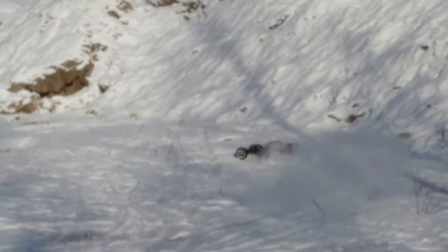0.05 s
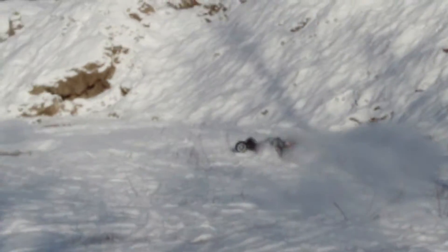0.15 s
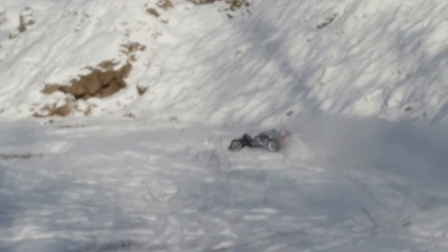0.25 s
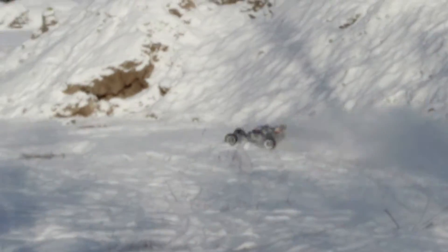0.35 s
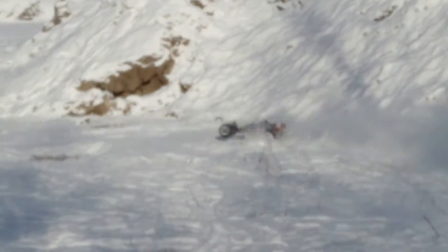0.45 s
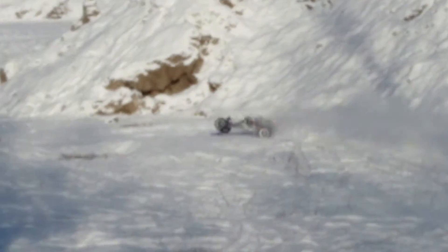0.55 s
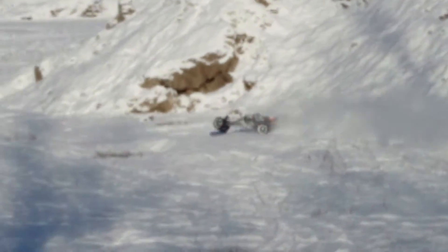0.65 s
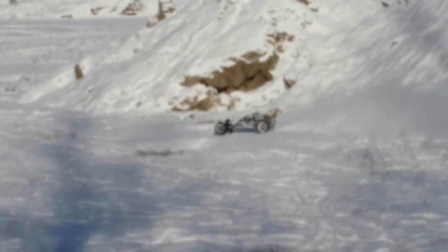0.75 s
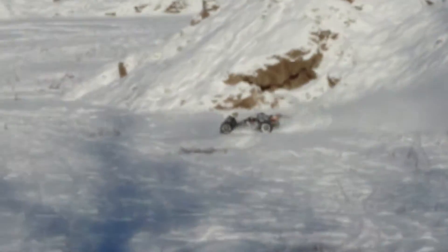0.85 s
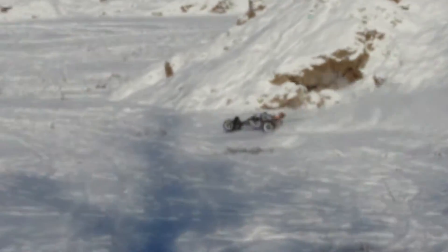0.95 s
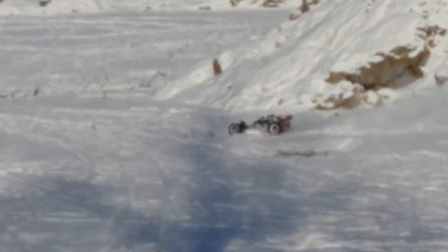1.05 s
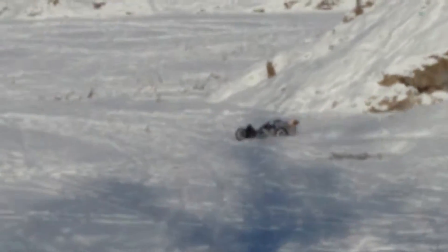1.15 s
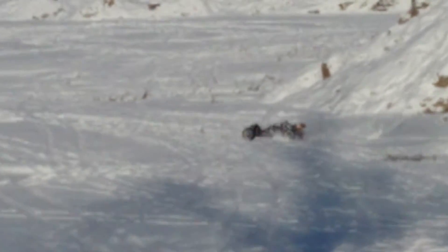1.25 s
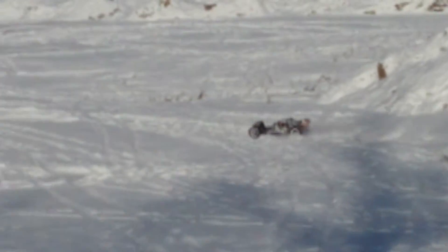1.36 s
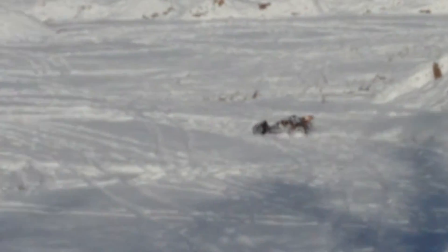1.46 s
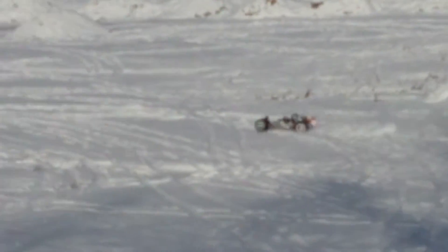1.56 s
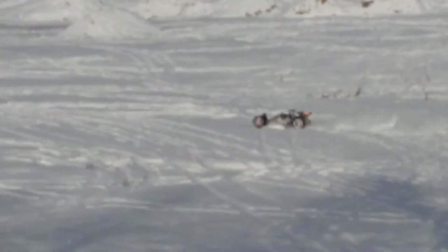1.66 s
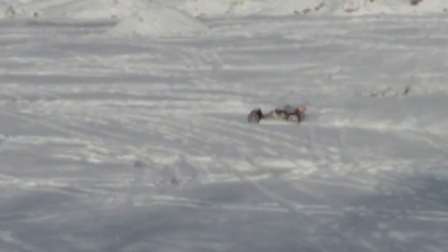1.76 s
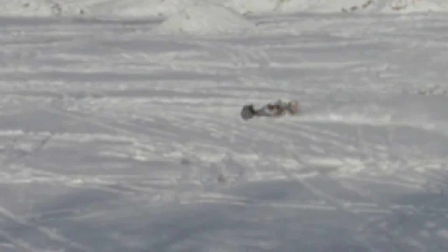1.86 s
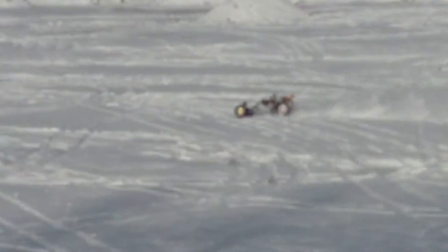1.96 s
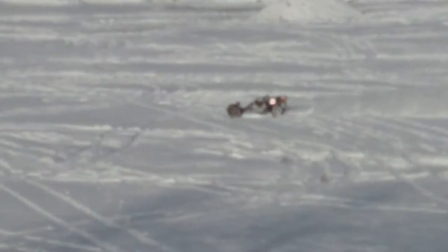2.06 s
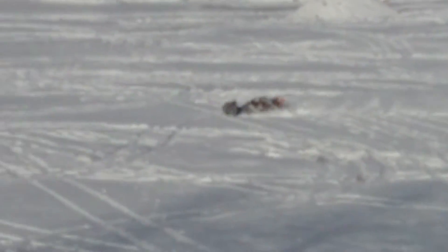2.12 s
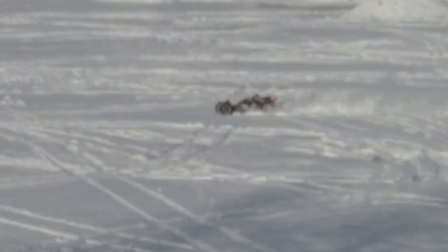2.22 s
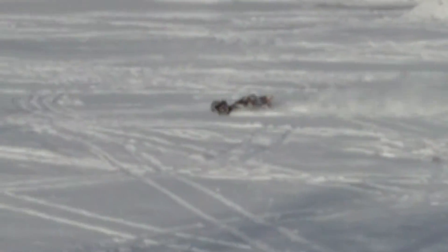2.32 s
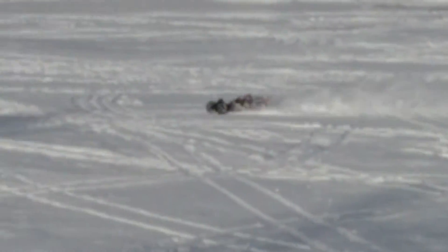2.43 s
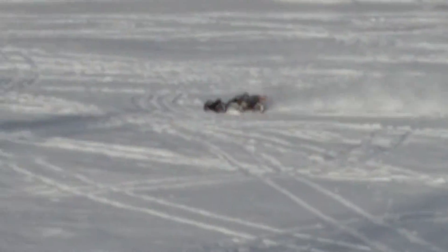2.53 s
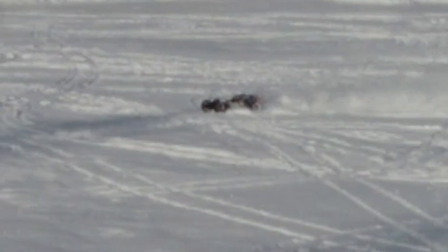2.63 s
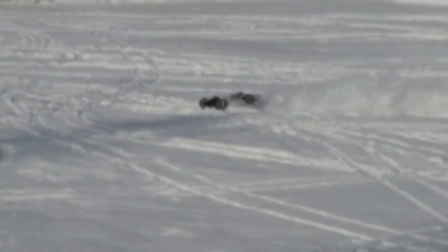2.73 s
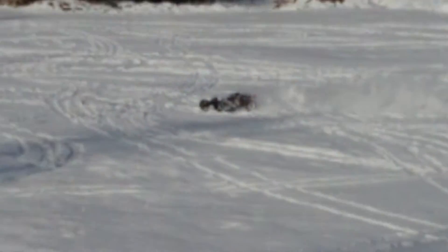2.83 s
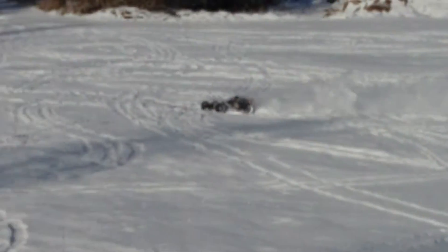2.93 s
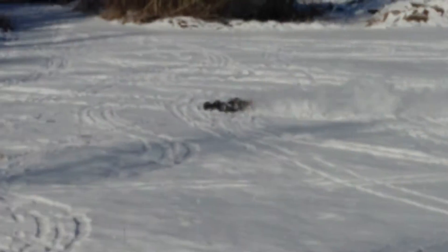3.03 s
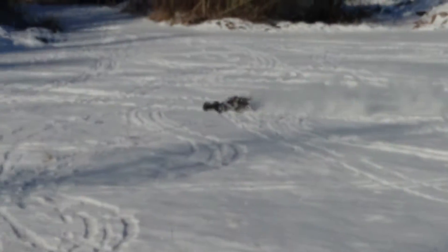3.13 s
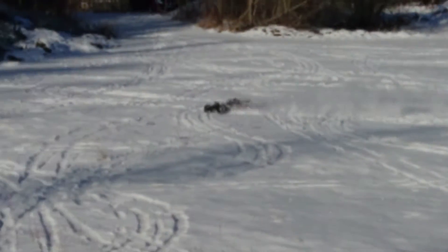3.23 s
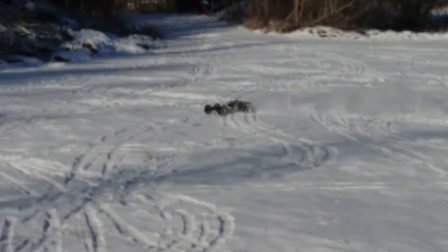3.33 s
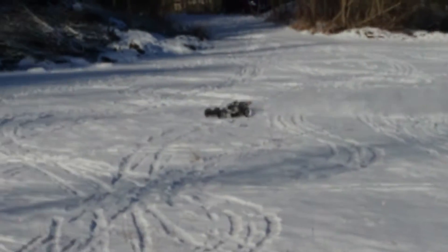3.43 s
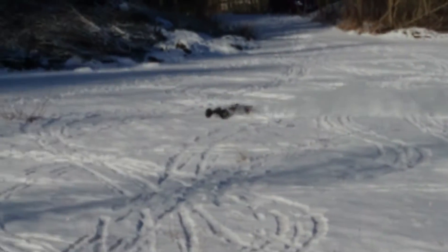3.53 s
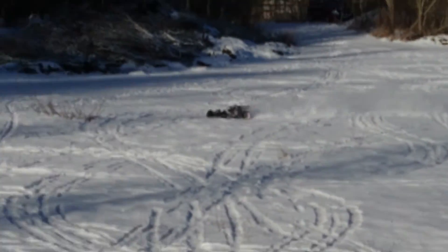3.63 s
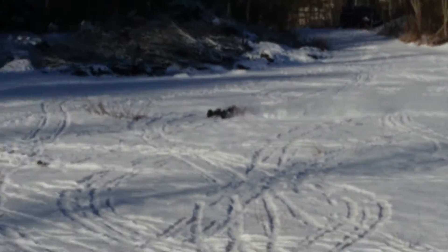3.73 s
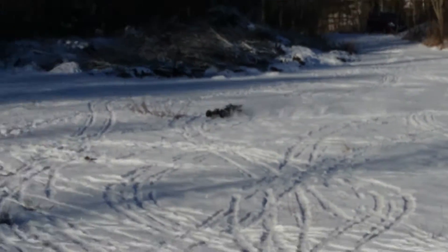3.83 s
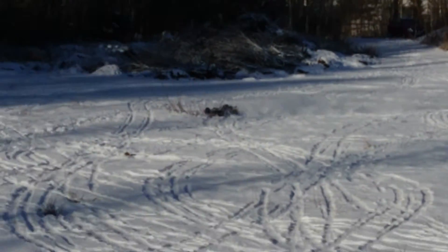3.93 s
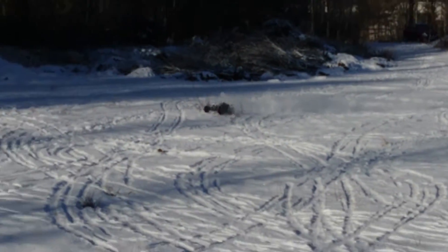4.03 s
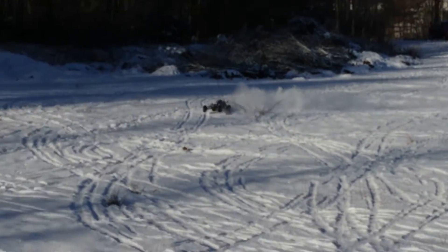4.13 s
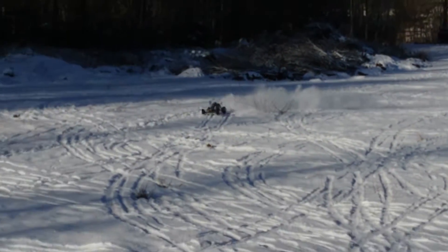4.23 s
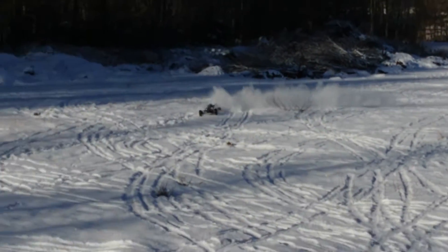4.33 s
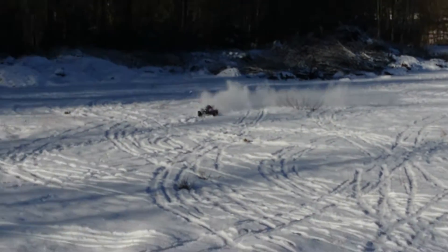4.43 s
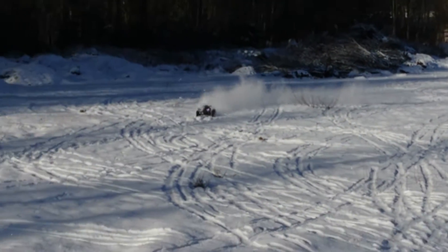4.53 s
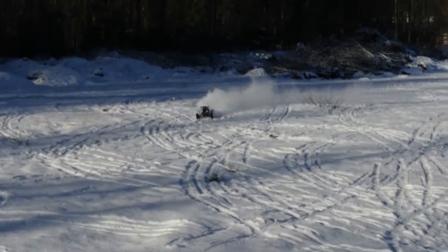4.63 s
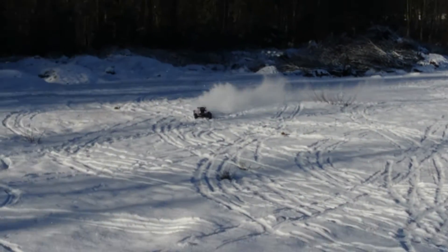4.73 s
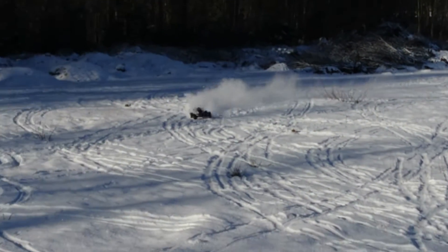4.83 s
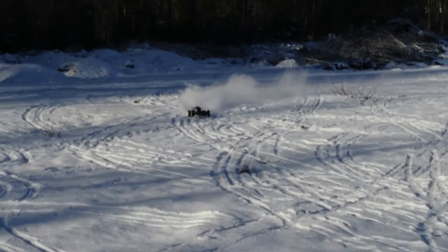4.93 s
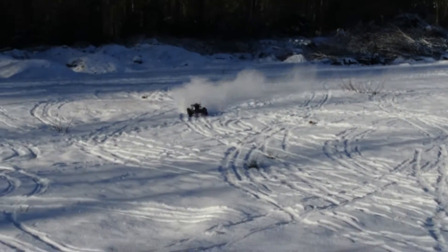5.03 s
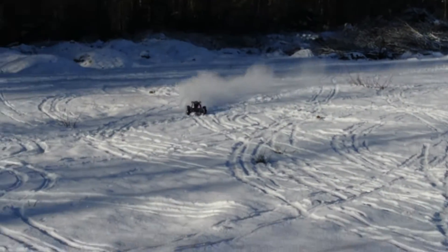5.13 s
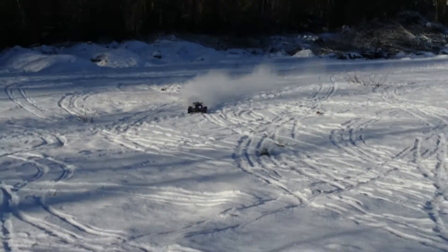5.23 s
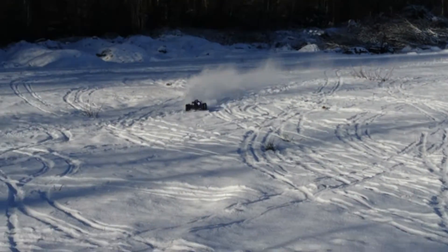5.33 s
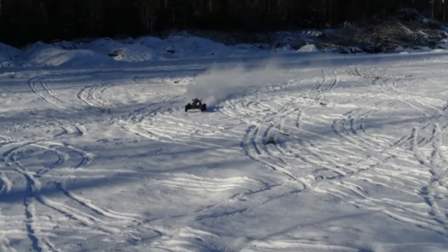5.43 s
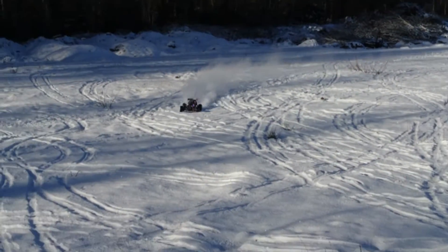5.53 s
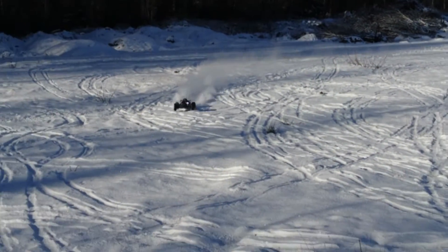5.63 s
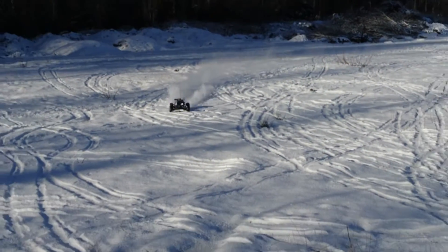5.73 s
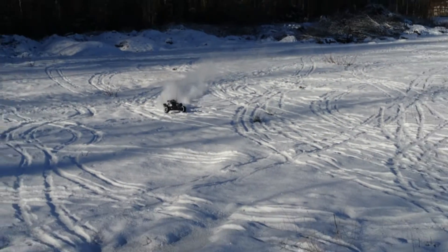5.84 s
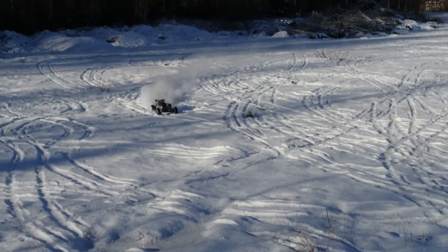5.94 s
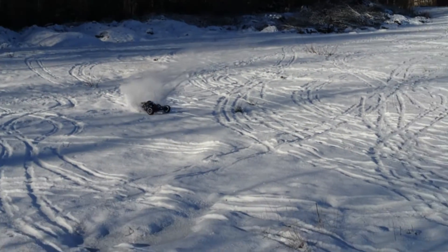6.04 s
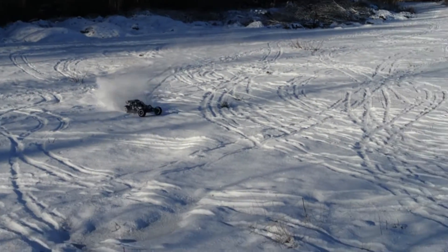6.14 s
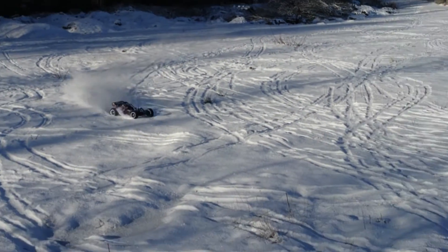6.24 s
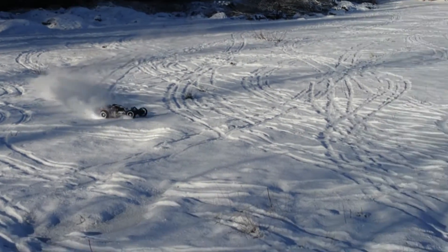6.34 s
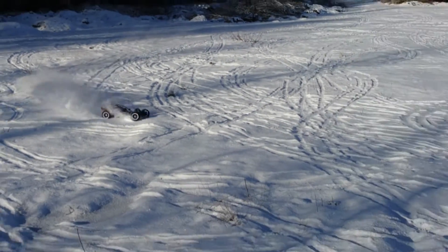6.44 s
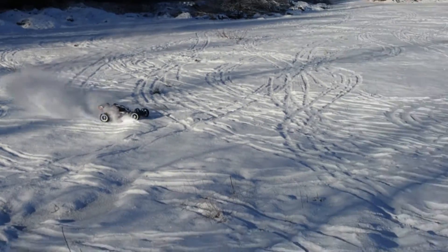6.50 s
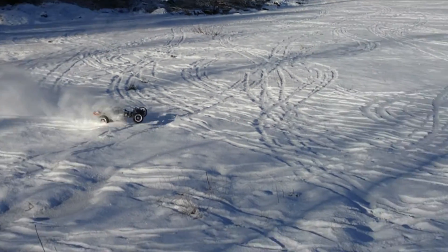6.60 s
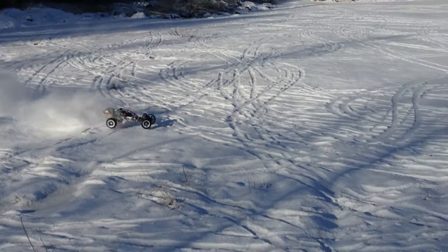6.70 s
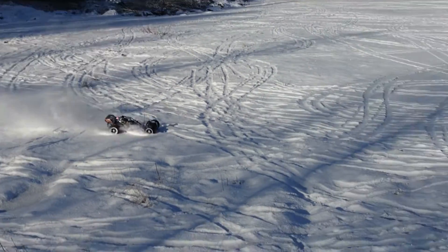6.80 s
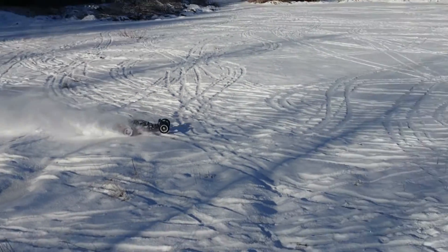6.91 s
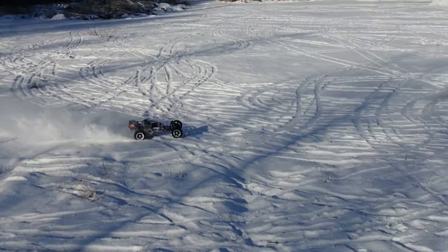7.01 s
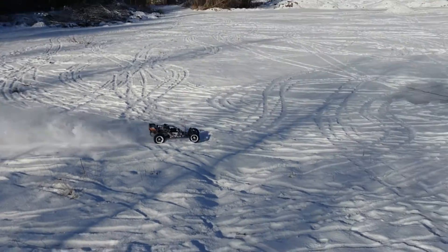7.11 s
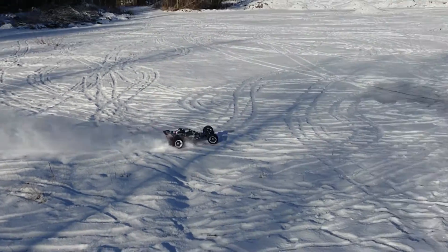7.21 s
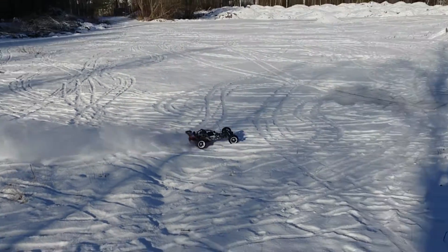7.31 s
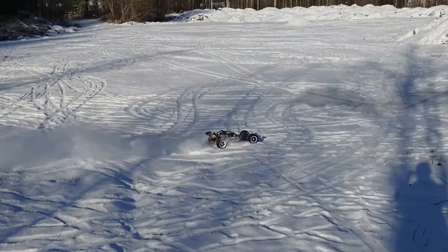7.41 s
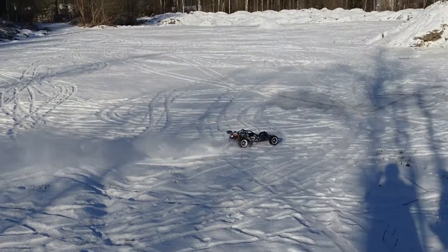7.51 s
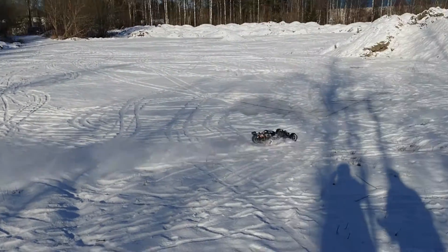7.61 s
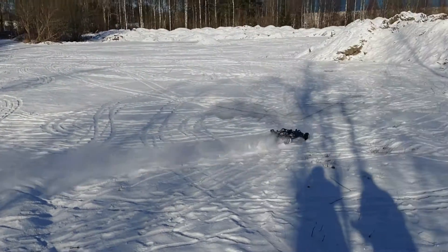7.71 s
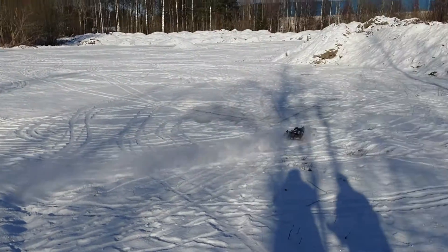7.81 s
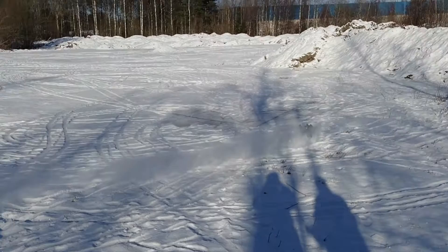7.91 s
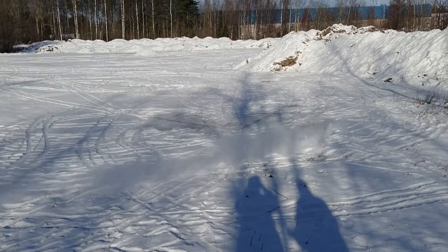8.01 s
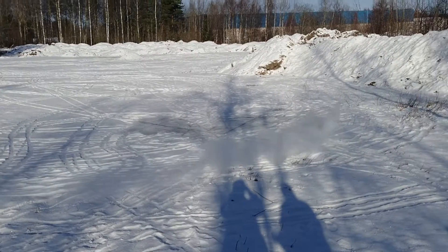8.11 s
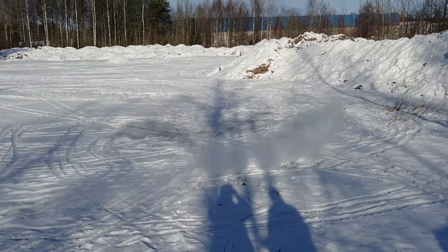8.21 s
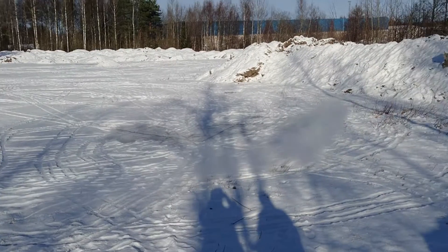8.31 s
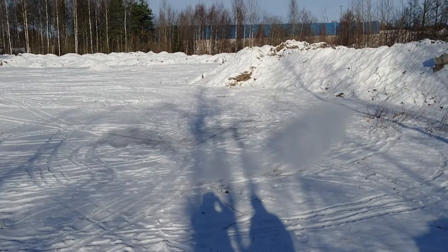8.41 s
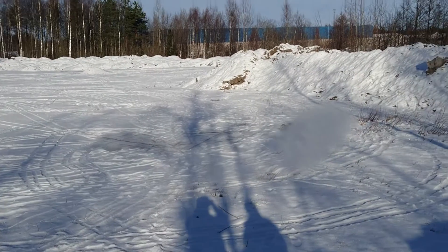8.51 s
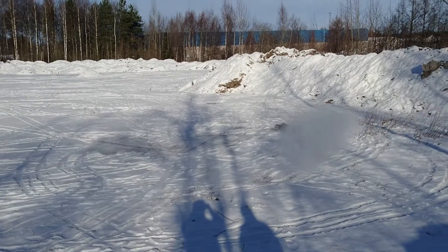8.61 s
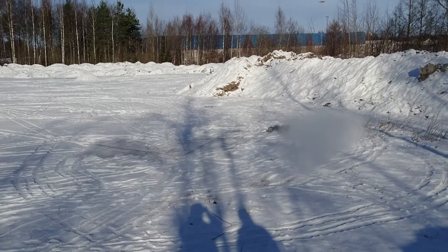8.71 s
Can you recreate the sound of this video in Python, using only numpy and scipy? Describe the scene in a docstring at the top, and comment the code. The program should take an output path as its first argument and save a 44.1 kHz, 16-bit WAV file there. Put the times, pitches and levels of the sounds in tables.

```python
"""A model buggy with a small two-stroke engine sets off across a rutted, snowy field. Each firing booms
in the exhaust, rings the silencer and spits a puff of gas. The buggy surges and bucks as it moves away,
and turns far off at about 4 s. Then it races back, tyres throwing up snow, and passes the listener
after 7 s. All along, a snow bank and distant trees give a thin echo over the soft winter air."""
import sys
import numpy as np
from scipy import signal
from scipy.fft import rfft, irfft
from scipy.io import wavfile
from scipy.ndimage import uniform_filter1d

SR = 44100
rng = np.random.default_rng(int(sys.argv[2]) if len(sys.argv) > 2 else 0)


def inscribe(sig):
    """Save sig as 16-bit PCM at rate SR to the path in sys.argv[1].

    A 1-D sig is mono; a 2-D sig holds one channel per row.
    Samples are clipped to [-1, 1] before scaling.
    """
    pcm = np.round(np.clip(np.atleast_2d(sig).T, -1, 1) * 32767)
    wavfile.write(sys.argv[1], SR, pcm.astype(np.int16))


N = 386316
T = np.arange(N) / SR
HZ = np.fft.rfftfreq(N, 1 / SR)

# Firings per second that the engine settles to between surges: time_s, speed_hz
CRUISE_SPEED = [(0.0, 238), (1.8, 240), (2.6, 244.9), (6.0, 245.5), (8.76, 240.4)]
# The engine speeds up on a blip of throttle or a wheelspin, and sags when the wheels dig in:
# start_s, length_s, change_hz
SPEED_SURGES = [(0.084, 0.11, -15.5), (0.285, 0.12, -29.5), (0.923, 0.072, 12.5), (1.044, 0.095, -11.5),
                (1.48, 0.054, -20.5), (1.659, 0.031, 12), (1.765, 0.044, -7), (2.06, 0.239, 19.5),
                (3.047, 0.087, 16.5), (3.167, 0.077, -10.5), (3.296, 0.2, 13.5), (3.594, 0.097, 21.5),
                (3.795, 0.063, 13.5), (4.009, 0.14, 13.5), (4.17, 0.08, -7.5), (4.259, 0.227, 25.5),
                (4.781, 0.13, 15), (5.198, 0.229, 17.5), (5.558, 0.2, 24.5), (5.821, 0.34, 19.5),
                (6.255, 0.19, 24.5), (6.602, 0.13, 26), (6.801, 0.15, 38.5), (7.012, 0.094, -12.5),
                (7.07, 0.22, 12.5), (7.331, 0.083, -7.5), (7.621, 0.11, 7.5), (7.911, 0.044, 17),
                (8.057, 0.086, 15.5), (8.388, 0.15, 25), (8.649, 0.022, -7.5)]
# The tailpipe's low tones, changing with distance and heading: time_s, boom_db, octave_db, pipe_db
TAILPIPE_LEVELS = [(0.0, -27.5, -42, -41.5), (0.42, -29, -59, -53), (0.68, -30.5, -53.5, -43.5),
                   (1.35, -31, -56.5, -53), (2.0, -32.5, -56.5, -47), (2.65, -41.5, -54, -48),
                   (3.2, -54.5, -56, -47), (4.05, -61.0, -58, -45), (4.3, -63, -71, -41),
                   (4.8, -49, -65, -42.5), (5.9, -40, -65, -37.5), (6.38, -44, -56, -36.5),
                   (6.6, -36.5, -43, -30.5), (6.87, -29.5, -43, -27), (7.2, -25.5, -42, -25.5),
                   (7.42, -21.0, -46.5, -28), (8.0, -23.5, -46, -34), (8.76, -23, -44.5, -37.5)]
# The exhaust's hard edge, changing the same way: time_s, bark_db, ring_db, rasp_db
EDGE_LEVELS = [(0.0, -29.0, -17.5, -17), (0.25, -31.5, -20, -23.5), (0.5, -29, -14.5, -24.5),
               (1.1, -35, -20.5, -27.5), (1.3, -36.5, -20.5, -24), (2.2, -35.5, -26.5, -29),
               (2.7, -38.5, -33, -32.5), (2.95, -40.5, -36.5, -40), (3.55, -34, -30.5, -41),
               (4.0, -39.5, -35.0, -38.5), (4.28, -39.5, -26.5, -43.5), (5.1, -37.5, -30, -37.5),
               (5.7, -32.5, -27.5, -40), (6.05, -33, -29, -38), (6.75, -25.5, -22, -27),
               (7.35, -21.5, -18.5, -23), (8.2, -20, -15, -19.5), (8.76, -22.5, -10.5, -22.5)]
# How ragged the firings are, as swirling gas against the clean pulse: time_s, gas_db
RAGGEDNESS = [(0, -6), (0.6, -8), (1.3, -4), (1.7, -7), (2.7, -3), (3.2, -6), (4, -6), (4.25, -3), (6, -3),
              (6.7, -5), (7.2, -2), (7.7, -4), (8.45, -10), (8.76, -5)]
# At times every other firing is weaker, which adds a burble an octave down: time_s, level_db
BURBLE_LEVEL = [(0, -40), (0.35, -48), (0.6, -57), (1.4, -52), (2.5, -66), (4.3, -78), (5.4, -65),
                (6.3, -85), (8, -73)]
# The notes at which each part of the exhaust rings: pitch_hz, width_hz, level_db
PIPE_MODES = [(675, 110, 17.5), (980, 316, 19), (1340, 160, 11.5), (1580, 190, -10)]
CHAMBER_MODES = [(2157, 70, -3.5), (2450, 344, 4.5), (2958, 320, -2)]
SILENCER_MODES = [(3685, 180, -1), (4140, 535, 3.5), (4906, 250, -4.5)]
OUTLET_MODES = [(5680, 370, 0), (6200, 300, 5.5), (6940, 540, 6.5), (7455, 490, 5), (9040, 1500, -1),
                (9760, 850, 5)]
SPIT_MODES = [(10560, 1200, -2), (13700, 410, -6.5), (13100, 280, -4.5), (15920, 450, 3.5)]
# The outlet's highest notes (the spit) form a beam, so heading matters: time_s, spit_over_rasp_db
SPIT_AIM = [(0, 0), (0.6, 1.5), (1.2, -10), (2.2, -3.5), (2.7, -2.5), (3.5, -6), (5.7, -5), (6.3, -1),
            (7.2, -0.5), (7.7, 2), (8.76, 3)]
# Ruts that tip the outlet towards the listener: time_s, lift_db
RUTS = [(1.411, 4.5), (1.68, 4.5), (1.89, 4), (2.149, 7), (2.38, 7.5), (2.66, 5), (2.8, 4.5), (3.085, 7),
        (3.385, 13.5), (3.66, 12), (3.901, 6), (4.18, 9), (6.33, 5)]
# Exhaust notes that stand out at certain headings: start_s, end_s, pitch_hz, width_hz, level_db
WHINE_NOTES = [(0.6, 1.453, 4180, 300, -27), (2.1, 3.85, 3540, 239.4, -37),
               (2.936, 4.147, 6370, 244, -37.5), (4.099, 4.454, 4596, 695, -47),
               (4.102, 6.1, 4090, 299.5, -36.5), (4.135, 6.6, 1040, 136, -49.5),
               (6.04, 6.546, 5040, 200.6, -24.5), (6.306, 7.6, 4430, 498.7, -28),
               (6.585, 7.05, 1069, 134.2, -46), (6.593, 7.294, 5070, 237, -20),
               (6.495, 8.3, 2140, 300, -30.5), (7.242, 7.701, 2436, 180, -26.5),
               (7.604, 8.9, 3456, 297, -21)]
# How loud the thrown snow and the chassis rumble are: time_s, level_db
SPRAY_LEVEL = [(0, -40), (2.5, -46), (4, -52), (6, -49), (6.7, -38), (7.2, -31), (7.7, -34), (8.2, -37),
               (8.76, -39)]
CHASSIS_LEVEL = [(0, -48), (0.6, -50), (0.95, -56), (1.3, -53.5), (2.2, -57.5), (3.4, -62), (4.4, -59.5),
                 (5.3, -51), (6, -48.5), (6.6, -47), (7.35, -39), (8.2, -42.5), (8.76, -46)]
# The tone of the thrown snow, the chassis and the air over the field: pitch_hz, level_db
SPRAY_TONE = [(200, -10), (900, -17), (2200, 9), (5000, -13), (10000, -1), (16000, -27)]
CHASSIS_TONE = [(20, -17), (50, -4), (90, 0), (125, 0), (170, -1.5), (350, -9), (700, -12), (1500, -4.5),
                (3000, -43.5)]
AIR_TONE = [(20, -5), (100, -6), (200, 2), (400, -24), (1000, -16), (4000, -22), (16000, -31)]
# How much louder the left microphone opening is than the right: pitch_hz, left_over_right_db
MIC_BALANCE = [(60, -1), (250, -5.5), (800, -2), (1400, 1.5), (2400, -4.5), (2850, -21), (3400, -1),
               (4100, 1.5), (4750, 11), (5600, -3.5), (7500, -6.5), (9900, 4.5), (12000, 2), (15000, -6)]
# How far the wave at the left opening runs ahead: pitch_hz, left_lead_rad
MIC_PHASE = [(1300, 0.5), (2450, -1.5), (2800, -5), (3300, -4.5), (4500, -4.5), (4800, -7.5), (5400, -1.5),
             (6100, -0.97), (7200, -1.26), (9500, 2), (12500, 5.5), (16000, 3.5)]


def engine(load_db_per_hz=.03, ring_share=.41):
    """Firings and gas ring the pipe, expansion chamber, silencer and outlet over a low boom."""
    boom_db, octave_db, pipe_db = curves(TAILPIPE_LEVELS)
    bark_db, ring_db, rasp_db = curves(EDGE_LEVELS)
    rough = gain(curves(RAGGEDNESS)[0])
    surge_hz, bump_db = surge(), bucking()
    turns = crankshaft(curves(CRUISE_SPEED)[0] + surge_hz, rough)
    pulses, puffs = firings(turns, rough), rough * gas_puffs(turns)
    # the higher a part rings, the more swirling gas is in what drives it
    smooth, grainy, coarse, harsh = (normalise(pulses + share * puffs) for share in (.25, .55, .9, 1.5))
    # the tailpipe flow is nearly a pure tone, with traces of the octaves above and below
    boom = normalise(np.sin(2 * np.pi * turns)) * gain(boom_db + 1.2 * wobble(55))
    octave = np.sin(4 * np.pi * turns)
    octave = normalise(octave) * gain(octave_db + 3.1 * wobble(70))
    burble = np.sin(np.pi * turns) * wobble(52) * gain(curves(BURBLE_LEVEL)[0])
    pipe = resonate(smooth, PIPE_MODES, 672, 1450) * gain(pipe_db + 1.25 * wobble(60))
    bark = resonate(coarse, CHAMBER_MODES, 1380, 3280) * gain(bark_db)
    # the silencer spreads its sound more widely, so it gets only a share of each bump
    ring = resonate(coarse, SILENCER_MODES, 3190, 5630) * gain(ring_db + ring_share * bump_db)
    rasp = resonate(harsh, OUTLET_MODES, 6110, 9720) * gain(rasp_db + bump_db)
    spit = resonate(harsh, SPIT_MODES, 8930, 21500) * gain(rasp_db + bump_db + curves(SPIT_AIM)[0])
    # small jolts shake the outlet, so its sound flutters
    edge = bark + ring + rasp * gain(1.3 * wobble(35)) + spit * gain(1.8 * wobble(22))
    load = gain(load_db_per_hz * surge_hz)  # louder as the engine surges
    return boom + octave + burble + (pipe + near_reflections(edge)) * load + whines(grainy)


def surge(curve=.7, settle_s=.039):
    """Speed above or below cruising, in Hz: each change builds fastest at first, then dies away."""
    surge_hz = 0
    for start_s, length_s, change_hz in SPEED_SURGES:
        build = np.clip((T - start_s) / length_s, 0, 1) ** curve
        settle = np.exp(-np.clip(T - start_s - length_s, 0, 1) / settle_s)
        surge_hz += change_hz * build * settle
    return surge_hz


def bucking(half_length_s=.07):
    """The treble's lift in dB: one smooth swell each time a rut points the outlet at the listener."""
    return sum(db * np.exp(-np.minimum(abs(T - s) / half_length_s, 10) ** 2) for s, db in RUTS)


def crankshaft(speed_hz, rough, gearing=15):
    """Count the engine's turns. Wheels grip and slip once per wheel turn, so the speed throbs."""
    wheel_turns = np.cumsum(speed_hz / gearing * (1 + .2 * wobble(16))) / SR
    throb = rough * np.sin(2 * np.pi * wheel_turns) * (1 + .3 * wobble(9))
    flutter = rough * wobble(120)  # from uneven burns
    return np.cumsum(speed_hz * (1 + .025 * throb + .0095 * flutter)) / SR


def firings(turns, rough, return_s=.0017):
    """A pressure pulse each time the exhaust port opens, and its bounce back from the pipe's end."""
    times = np.interp(np.arange(1, int(turns[-1])), turns, T)
    lateness, strength = rng.standard_normal((len(times), 2)).T
    times += .00003 * np.interp(times, T, rough) ** 2 * lateness
    burn_runs = np.interp(times, T, wobble(110))  # good and poor burns come in short runs
    sizes = gain(.4 * strength + .6 * burn_runs)
    drift_s = .00003 * np.interp(times, T, wobble(14))  # the round trip drifts with the gas's heat
    bounce = clicks(times + return_s + drift_s, sizes)
    return normalise(clicks(times, sizes) + .5 * bounce)


def gas_puffs(turns):
    """Swirling gas bursts out with each firing and dies down over the turn."""
    burst = np.exp(-(turns % 1) / .16) + .45
    return normalise(burst * rng.standard_normal(N))


def whines(drive, fade_s=.14, lag_s=.0021):
    """Narrow notes from the far end of the exhaust swell and fade as it swings past."""
    drive, out = np.roll(drive, int(lag_s * SR)), 0
    for start_s, end_s, hz, width_hz, db in WHINE_NOTES:
        swell = np.clip(np.minimum(T - start_s, end_s - T) / fade_s, 0, 1)
        out += gain(db) * swell * resonate(drive, [(hz, width_hz, 0)], .8 * hz, 1.25 * hz)
    return out


def snow_spray():
    """The tyres fling snow in uneven, hissing spurts."""
    return noise(SPRAY_TONE, width=.8) * gain(curves(SPRAY_LEVEL)[0] + 1.5 * wobble(30))


def chassis_rumble():
    """The chassis rumbles over the snow, louder when the buggy is near."""
    return noise(CHASSIS_TONE, width=.34) * gain(curves(CHASSIS_LEVEL)[0] + 3.5 * wobble(16))


def near_reflections(x, count=5, share=.28):
    """Add faint bounces off chassis and ruts; their paths shift with the buggy, differently per side."""
    out = np.array([x, x])
    for channel in out:
        for lag_s in np.linspace(.0004, .003, count) * rng.uniform(.85, 1.15, count):
            channel += share * np.interp(T - lag_s - .00007 * wobble(7), T, x)
    return out / np.sqrt(1 + count * share ** 2)


def field_echo(x, echo_db=-19, fade_s=1.0, first_s=.034, band_hz=(700, 5000)):
    """The snow bank and trees scatter a thin echo; soft snow swallows its bass and treble."""
    t = T[:SR]
    tail = rng.standard_normal((2, SR)) * gain(-60 * t / fade_s) * (t > first_s)
    tail /= np.sqrt(np.sum(tail[0] ** 2))
    tail = signal.sosfilt(signal.butter(1, band_hz, "band", fs=SR, output="sos"), tail)
    return gain(echo_db) * signal.fftconvolve(x, tail, axes=1)[:, :N]


def winter_air(level_db=-61):
    """The still air over the field makes a faint, steady hush."""
    return gain(level_db) * noise(AIR_TONE, width=.17)


def gain(db):
    """Turn decibels into a number to multiply by."""
    return 10 ** (np.asarray(db) / 20)


def normalise(x):
    """Scale a sound to an average (rms) level of 1."""
    return x / np.sqrt(np.mean(x ** 2))


def curves(table):
    """Join a table's points in time, giving one curve for each column after the first."""
    times, *columns = np.transpose(table)
    return [np.interp(T, times, column) for column in columns]


def spectrum(points):
    """Join a table's points in pitch, giving each octave equal room."""
    hz, value = np.transpose(points)
    return np.interp(np.log(HZ + 1), np.log(hz), value)


def noise(tone, width):
    """Stereo noise with the given tone; width sets how much left and right differ."""
    mid, side = irfft(rfft(rng.standard_normal((2, N))) * gain(spectrum(tone)), N)
    return normalise(np.array([mid + width * side, mid - width * side]))


def wobble(rate_hz):
    """A smooth random wander, about 1 in size, with rate_hz new values a second."""
    hold = int(SR / rate_hz)
    steps = rng.standard_normal(4000)[np.arange(N) // hold]
    return 1.3 * uniform_filter1d(uniform_filter1d(steps, hold), hold)


def clicks(times, sizes):
    """Clean clicks, each spread over 12 samples so that it can fall between two of them."""
    centres = times[:, None] * SR
    taps = np.floor(centres).astype(int) + np.arange(-5, 7)
    shape = np.sinc(taps - centres) * np.cos(np.pi * (taps - centres) / 12) ** 2
    return np.bincount(np.clip(taps, 0, N).ravel(), (sizes[:, None] * shape).ravel(), N + 1)[:N]


def resonate(x, modes, low_hz, high_hz):
    """Let a sound ring a part's notes, keep the band between two pitches and scale it to level 1."""
    ringing = sum(gain(db) * signal.lfilter(*signal.iirpeak(hz, hz / width_hz, fs=SR), x)
                  for hz, width_hz, db in modes)
    band = signal.butter(3, [low_hz, min(high_hz, .47 * SR)], "band", fs=SR, output="sos")
    return normalise(signal.sosfilt(band, ringing))


def scene():
    """The buggy, its echo and the still winter air."""
    motor = engine()
    return motor + snow_spray() + chassis_rumble() + field_echo(motor) + winter_air()


def record(dry, top_hz=15800):
    """A camera's body colours and delays its two microphone openings differently; the top is cut."""
    balance, lead = gain(spectrum(MIC_BALANCE)), spectrum(MIC_PHASE)
    openings = np.array([balance * np.exp(.5j * lead), np.exp(-.5j * lead)])
    openings *= np.sqrt(2 / (1 + balance ** 2))  # keep the total power the same
    heard = np.clip(irfft(rfft(dry) * openings, N), -1, 1)
    return signal.sosfilt(signal.ellip(10, .2, 70, top_hz, fs=SR, output="sos"), heard)


dry = scene()
out = record(dry)
inscribe(out)
```